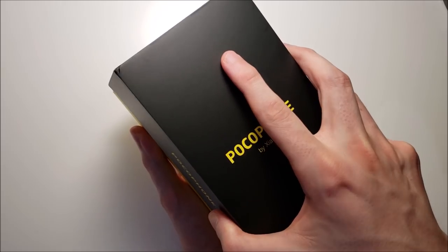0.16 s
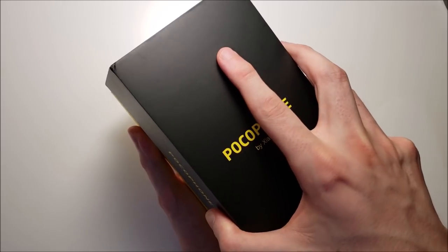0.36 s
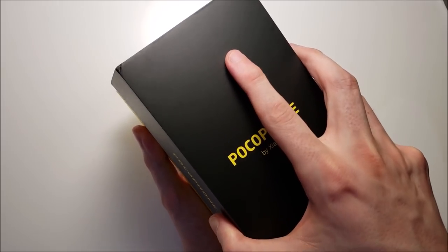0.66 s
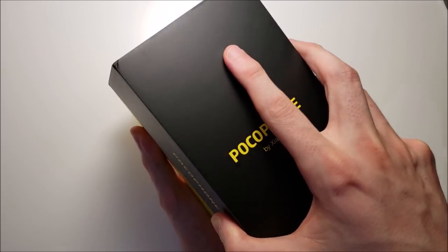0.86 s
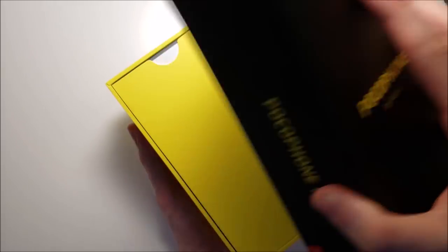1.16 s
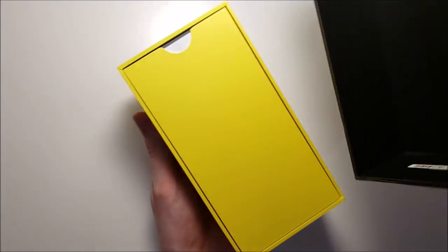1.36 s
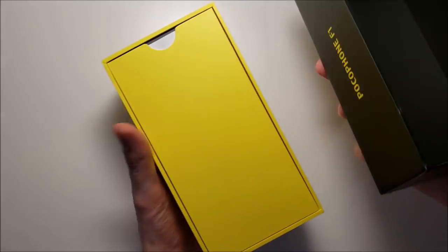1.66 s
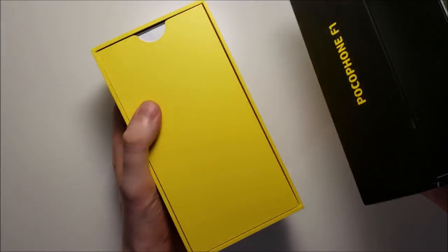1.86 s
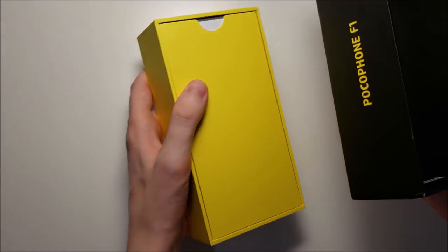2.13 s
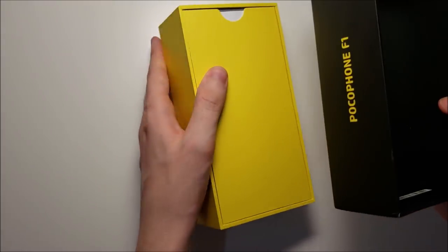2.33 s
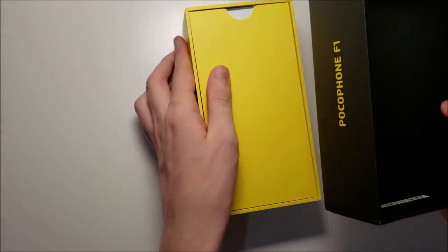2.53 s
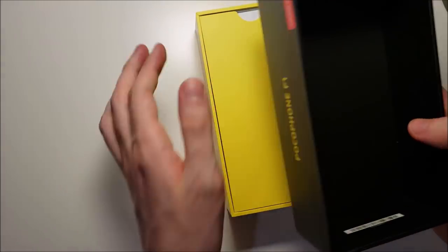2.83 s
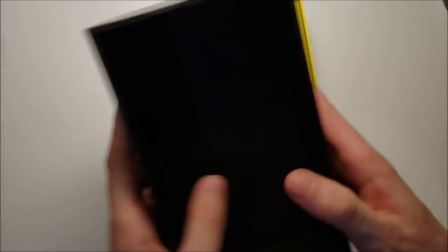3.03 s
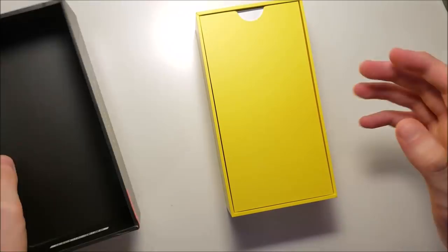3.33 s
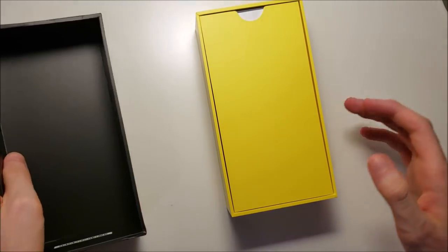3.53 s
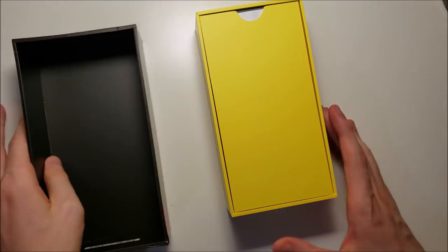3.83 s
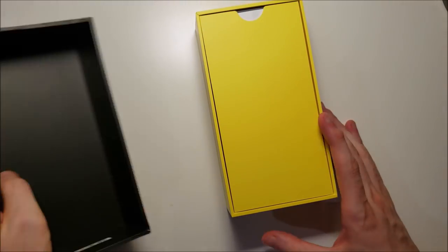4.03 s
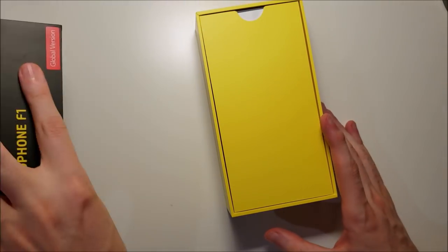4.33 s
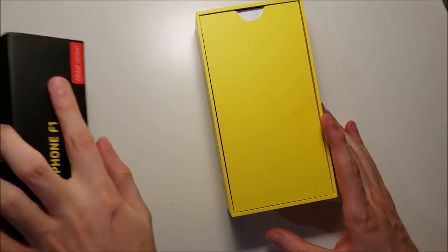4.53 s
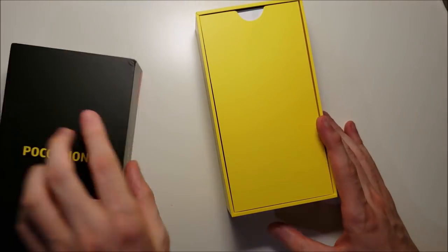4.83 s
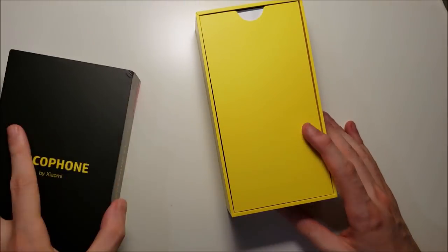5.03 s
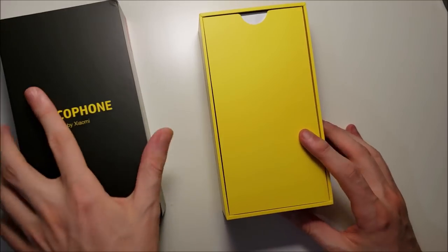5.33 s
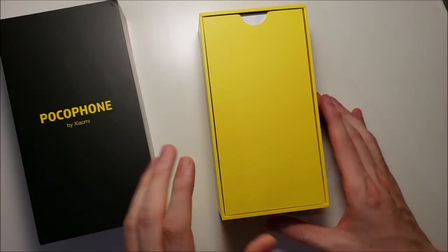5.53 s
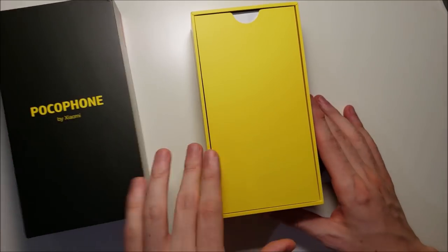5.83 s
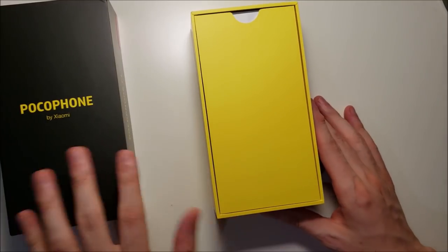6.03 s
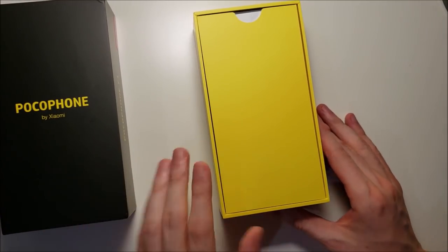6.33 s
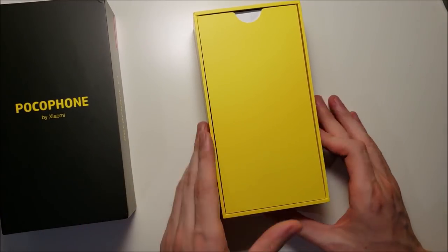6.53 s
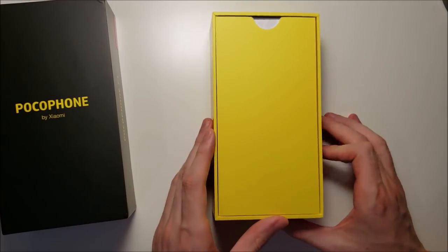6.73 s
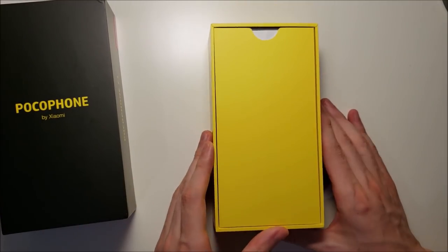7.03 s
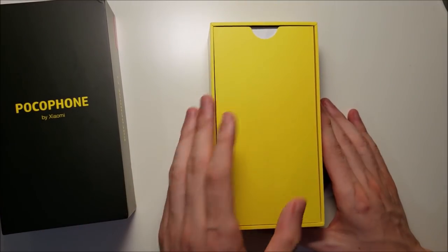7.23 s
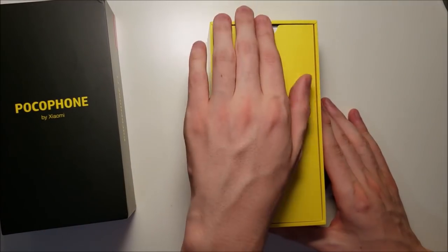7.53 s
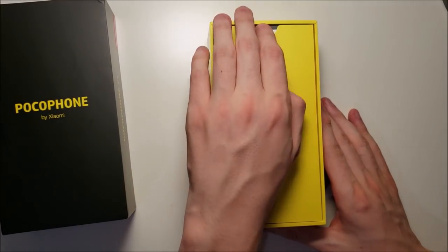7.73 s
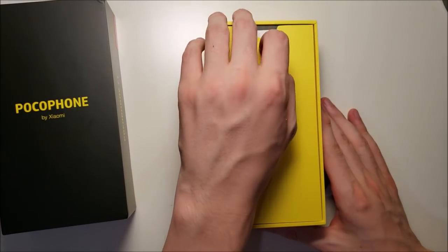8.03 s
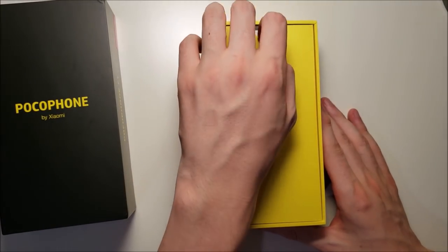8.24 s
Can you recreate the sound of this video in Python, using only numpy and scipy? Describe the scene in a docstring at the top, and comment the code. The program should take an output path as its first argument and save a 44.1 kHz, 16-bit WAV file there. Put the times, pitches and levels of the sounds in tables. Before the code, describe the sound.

A small room with a steady low rumble and faint hiss, heard through a close stereo microphone. From 0 to 0.9 s a snug card lid creeps off its tray with very soft friction, ending in a brush and a dull bump at about 1 s. Light fingertip taps and faint rubbing follow until 2 s. At 2.2 to 2.65 s the tray is set down: a few hollow knocks, the last heavy, with short gritty scrapes. Small bumps come around 3.1 s, a firmer one at 3.8 s with dragging. The strongest boxy thuds land at 4.4 and 4.75 s, with hissing slides. Fingers brush hollow card clearly at 5 to 5.3 s, then around 5.75 and 6.2 s, while the rumble dips near 5.7 s. Gentle slides follow at 6.6 to 7.1 s, a soft pat at 7.5 s, tiny taps around 8 s, and a barely audible thin whine.

```python
"""A small room with a low rumble, a close stereo microphone, and a stiff cardboard box handled on a table.
First the lid creeps up the tray as hands slip it off: soft card friction, then brushing skin and finger taps.
The tray is set down, the lid turned over and dropped beside it: dull knocks shaped by weight and hardness,
with hollow box booms and table modes. Card grinds and hisses over the table and fingers brush in between.
Late on the rumble sinks for a moment, and near the end a faint thin whine comes up in the background."""
import sys
import numpy as np
from scipy import signal
from scipy.fft import rfft, irfft, next_fast_len
from scipy.io import wavfile
from scipy.ndimage import map_coordinates

SR = 44100
rng = np.random.default_rng(int(sys.argv[2]) if len(sys.argv) > 2 else 0)


def int16_out(signal):
    """Quantize to a 16-bit WAV file."""
    q = np.round(np.clip(np.atleast_2d(signal).T, -1, 1) * 32767)
    wavfile.write(sys.argv[1], SR, q.astype(np.int16))


N = 369545  # samples

# Levels stand ahead of the echoes and the recorder; spectra are relative.
# room rumble and faint hiss: [f/Hz, level/dB]
BACKGROUND = [(20, -25.5), (38, -9.5), (56, 1), (85, -12), (150, -8), (260, -13), (350, -21), (480, -19.5),
              (800, -31), (1500, -48.5), (3000, -50), (9000, -53), (13000, -48), (15500, -51)]
# left-right likeness of diffuse sound at the microphones: [f/Hz, correlation]
ALIKE = [(130, 0.98), (300, .75), (640, .45), (1400, 0), (15000, 0)]
# faint thin tone: [full at t/s, rise/s, hold/s, fall/s, level/dB]
WHINE = [(8.2, 0.29, 0.2, .1, -62)]
# snug lid scuffing up the tray: [full pressure at t/s, rise/s, hold/s, fall/s, level/dB]
CREEP = [(0.02, 0.38, 0.13, 0.42, -61), (0.66, 0.49, 0.055, 0.065, -62), (0.92, 0.14, 0, 0.084, -55),
         (1.316, 0.03, 0.002, 0.028, -53.5)]
# friction colour of lid against tray: [f/Hz, level/dB]
SLEEVE = [(700, -3), (1100, -6.5), (1400, 1), (1900, -8), (2800, -19), (6000, -28.5)]
# fingers brushing a hollow box: [full pressure at t/s, rise/s, hold/s, fall/s, hollow level/dB, hiss level/dB]
BRUSHES = [(0.92, 0.088, 0, 0.05, -54.5, -58.5), (0.942, 0.015, 0.0045, 0.012, -58, -44.5),
           (1.35, 0.23, .09, 0.1, -66, -69.5), (1.62, 0.26, 0.013, 0.22, -64, -66),
           (2.09, 0.086, 0, .25, -88, -68), (3.062, 0.017, 0.02, 0.036, -64, -65),
           (3.185, 0.1, 0.0055, 0.048, -69, -59.5), (5.01, 0.15, .05, 0.013, -47.5, -48.5),
           (5.12, 0.035, 0.21, 0.1, -45, -43.5), (5.748, 0.0564, 0.022, 0.059, -42.5, -63.5),
           (5.885, 0.11, 0.053, 0.064, -53.5, -55.5), (6.19, 0.0313, 0, 0.085, -42, -53),
           (7.54, .02, 0, .08, -48.5, -69), (8.11, 0.071, 0.0099, .12, -68, -67.5)]
# resonances of the box's air and panels: [f/Hz, width/Hz, level/dB]
HOLLOW = [(453, 42, 7), (548, 50, 5), (953.5, 470, -11.5), (1880, 200, -22)]
# hiss of skin on smooth card: [f/Hz, level/dB]
SKIN = [(1200, -2), (2200, -4), (3200, -8), (4200, 1.5), (5700, -9.5), (6700, -5), (7200, 0), (7900, -7),
        (8700, -11.5), (11500, -8.5), (15500, -14)]
# knocks of tray, lid and hand; a box held in the air hardly rings the table:
# [t/s, strength level/dB, bass weight level/dB, hardness f/Hz, click level/dB, table ring level/dB,
#  booms of the struck panels [f/Hz, level/dB, t60/s]]; weight, click, ring and booms are relative to strength
KNOCKS = [(0.945, -2, 7, 1100, -31.5, -16, [(839, -31.5, 0.058)]),
          (1.0262, 15.5, -20, 844, -24.5, -25, [(305, -25, 0.036), (560, -35.5, .06), (1650, -43.5, .035)]),
          (2.2376, 9, 2.5, 550, -36.5, -0.5, [(379, -34, 0.066)]),
          (2.262, -1, 4.5, 480, -40, -19, [(340, -27.5, .05)]),
          (2.399, 16, -2, 1400, -33.5, 1.5, [(770, -28.5, 0.035), (525, -36.5, .08)]),
          (2.6482, 24, 2.5, 1230, -24, 1, [(116, -28, 0.18), (155, -34, .16), (245, -34, .06),
          (516, -38.5, .05), (849, -39, 0.063)]), (3.051, 2.5, 11.5, 297, -52, -16, [(314, -36, 0.13)]),
          (3.076, -10, -2, 1310, -27.5, -10, [(830, -29, 0.043)]),
          (3.141, -12.5, -6, 1610, -23.5, -11, [(880, -32, .05)]),
          (3.187, -15, -4, 1470, -25, -9, [(345, -24, .08)]),
          (3.5605, 3.5, -2.5, 618, -42, -13, [(169.6, -34, 0.2)]),
          (3.804, 13, -4, 1660, -22.5, 3.5, [(885, -32.5, 0.075), (690, -35.5, .06), (1280, -35.5, .06)]),
          (4.39, 11, -3, 740, -33.5, -2, [(248, -17, 0.12)]),
          (4.3939, 24.5, 3.5, 870, -31, -2, [(178, -36, 0.24), (305, -29.5, 0.072), (940, -36, .05)]),
          (4.7551, 26.5, -6.5, 1840, -28.5, 3.5, [(157, -40, 0.19), (450, -35.5, .08)]),
          (4.763, 20, -3, 1730, -31.5, -2, [(538, -29.5, .11), (187, -33.5, .12)]),
          (4.781, 22, 2, 1103, -28, -6.5, [(312, -25.5, 0.06)]),
          (5.0436, 6.5, -18, 800, -28, 1, [(212, -33.5, 0.11)]),
          (5.053, 7.5, -1, 440, -28, -25, [(424, -26, 0.084)]),
          (6.169, 4.5, 6.5, 413, -43, -9, [(439.6, -36.5, 0.094)]),
          (6.252, -7.5, -12, 450, -27.5, 10, [(490, -28, .05)]),
          (7.198, -10.5, 2, 452, -36, -6, [(255, -40, .1)]),
          (7.521, -1, -1.5, 546.5, -32, 4.5, [(505, -31.5, 0.08), (122, -26, .12)])]
# colour of the card, stamped on every knock: [f/Hz, level/dB]
CARD = [(180, -0.5), (240, -7), (310, 1), (390, -4), (520, -0.5), (1600, 2.5), (2080, 0.5), (2450, -5.5),
        (3300, -3), (4300, 0), (5600, -8.5), (7400, -1.5), (8600, -11.5), (15500, -12)]
# modes of table and room, rung by every knock and tap: [f/Hz, level/dB, t60/s]
TABLE = [(114.6, 3.5, 0.33), (155, 7.5, .25), (311, -8, .3), (436, 4, 0.16), (544, 2, 0.27),
         (656, -2.5, .25), (847, 2.5, 0.42), (978, 7, .28), (1145, -1.5, .2), (1580, 0, 0.19),
         (2047, 8.5, 0.31)]
# decay of the room: [f/Hz, t60/s]
ROOM = [(120, 0.5), (700, 0.28), (2000, 0.37), (5000, 0.35), (14000, 0.33)]
# light fingertip taps: [t/s, level/dB, pitch f/Hz]
TAPS = [(1.316, -10, 1000), (1.362, -24, 4030), (1.538, -4.5, 730), (1.754, -10.5, 910), (1.853, -10, 850),
        (2.279, -5, 1150), (3.059, -16, 1720), (3.107, -10, 1260), (3.952, 1.5, 684), (5.473, -20, 3610),
        (5.689, -3.5, 520), (7.177, -9.5, 599), (7.2, -20, 1250), (7.942, -17, 1390), (8.08, -19, 1856)]
# card dragged over the table: [full pressure at t/s, rise/s, hold/s, fall/s, grind level/dB, hiss level/dB]
DRAGS = [(2.405, 0.013, .04, 0.19, -40, -52), (2.445, 0.055, .02, .13, -53, -46.5),
         (2.545, 0.056, .015, .07, -49, -63), (2.63, 0.083, 0.012, .1, -46, -44),
         (2.83, 0.03, 0.01, 0.06, -54, -63.5), (3.79, .19, 0.035, 0.15, -49.5, -52.5),
         (4.04, 0.08, 0.02, 0.06, -47, -46.5), (4.42, 0.044, 0.0017, 0.079, -59, -50),
         (4.56, 0.17, 0.018, .12, -51.5, -51), (4.655, .07, .03, 0.1, -47, -43.5),
         (4.82, 0.11, 0.015, .2, -45.5, -44.5), (6.65, 0.04, 0.045, .07, -51, -50.5),
         (6.785, 0.11, 0.028, 0.13, -49.5, -58), (6.965, 0.08, .015, 0.05, -59.5, -77),
         (7.04, 0.0297, 0.017, 0.086, -56, -72)]
# low grind of dragged card: [f/Hz, level/dB]
GRIND = [(100, -26), (300, -4), (700, 1), (1400, -3), (2300, -6.5), (3000, -13), (4500, -32.5)]
# high hiss of dragged card: [f/Hz, level/dB]
HISS = [(1200, -2.5), (2500, 7.5), (4500, 5), (6000, 3), (8000, 2.5), (12000, 0), (15500, -4.5)]
# echoes off table, boxes and wall, one list for each microphone, left then right: [delay t/s, gain]
ECHOES = [
    [(.0013, 0.15), (.0047, 0.18), (.0094, 0.22), (.0161, 0.17)],
    [(.0021, 0.12), (.0056, .3), (.0092, 0.17), (.0183, 0.14)],
]

RUMBLE_DB = -49
LULL_S, LULL_WIDTH_S, LULL_DB = 5.66, 0.63, -4  # the rumble and hiss sink once
FADE_DB = 21.5  # change over one rise or fall time; the slope carries on beyond it
# shape of every blow: bass shelf, slope, fall above its hardness
BASS_HZ, TILT_DB_PER_OCT, SOFTNESS_DB_PER_OCT = 172, -2.5, 22
CLICK_HZ, CLICK_DB_PER_OCT = 5000, -7
TOP_HZ = 15830  # band limit of the recorder


def amp(db):
    """Decibels to gain."""
    return 10 ** (np.asarray(db) / 20)


def unit(x):
    """Scale to rms 1."""
    return x / np.sqrt(np.mean(x ** 2) + 1e-20)


def along(points, hz):
    """Read (Hz, value) points on a log frequency axis."""
    f, v = np.transpose(points)
    return np.interp(np.log(hz + 1), np.log(f + 1), v)


def filtered(x, response):
    """Multiply the spectrum of x by a response of frequency."""
    n = x.shape[-1]
    padded = next_fast_len(n + SR // 8)
    spectrum = rfft(x, padded) * response(np.fft.rfftfreq(padded, 1 / SR))
    return irfft(spectrum, padded)[..., :n]


def coloured(x, points):
    """x with this (Hz, dB) spectrum, at rms 1."""
    return unit(filtered(x, lambda hz: amp(along(points, hz))))


def diffuse(size):
    """White stereo noise, alike in the bass and unrelated in the treble."""
    def mid_side(hz):
        turn = np.arccos(np.clip(along(ALIKE, hz), -1, 1)) / 2
        return np.array([np.cos(turn), np.sin(turn)])

    mid, side = filtered(rng.standard_normal((2, size)), mid_side)
    return np.array([mid + side, mid - side])


def wobble(rate):
    """A smooth random curve, rate knots a second."""
    knots = rng.standard_normal(int(N * rate / SR) + 4)
    return map_coordinates(knots, [np.arange(N) * rate / SR])


def swells(rows):
    """Rise, hold and fall, straight in dB, summed over the rows: one gain curve for each dB column."""
    t, gains = np.arange(N) / SR, 0
    for s, rise, hold, fall, *db in rows:
        before = np.maximum(s - t, 0) / rise
        after = np.maximum(t - s - hold, 0) / fall
        gains = gains + np.outer(amp(db), amp(-FADE_DB * (before + after)))
    return gains


def background(whine_hz=641):
    """Room rumble and faint hiss that sink for a moment, and a thin whine of unsteady pitch near the end."""
    t = np.arange(N) / SR
    lull = np.exp(-((t - LULL_S) / LULL_WIDTH_S) ** 2)
    rumble = amp(RUMBLE_DB + LULL_DB * lull) * coloured(diffuse(size=N), BACKGROUND)
    pitch = whine_hz + 2.36 * wobble(14)
    whine = np.sin(2 * np.pi * np.cumsum(pitch) / SR)
    return rumble + swells(WHINE) * unit(whine)


def friction(grain_db, unsteady_db):
    """Noise of fibres catching and letting go under an uneven hand."""
    return diffuse(size=N) * amp(grain_db * wobble(500) + unsteady_db * wobble(40))


def creep():
    """The walls of lid and tray rub softly until they part."""
    return swells(CREEP) * coloured(friction(grain_db=2.5, unsteady_db=1.8), SLEEVE)


def box_response(f):
    """The hollow of the box as resonances of alternating sign."""
    total = 0
    for k, (centre, width, db) in enumerate(HOLLOW):
        damping = 1j * f * width
        total = total + (-1) ** k * amp(db) * damping / (centre ** 2 - f ** 2 + damping)
    return total


def brushes():
    """Skin hisses on the smooth card and wakes the hollow of the box."""
    hollow, hiss = swells(BRUSHES)
    low = hollow * unit(filtered(friction(grain_db=1.5, unsteady_db=0.7), box_response))
    high = hiss * coloured(friction(grain_db=2.2, unsteady_db=1.3), SKIN)
    return (low + high) * amp([[.8], [-.8]])  # a little to the left


def highpass(x, hz):
    """Cut the bass below hz."""
    return signal.sosfilt(signal.butter(2, hz, "high", fs=SR, output="sos"), x)


def causal(points, size=4096):
    """The minimum-phase pulse that has this (Hz, dB) spectrum."""
    cepstrum = irfft(np.log(amp(along(points, np.fft.rfftfreq(size, 1 / SR)))))
    # folding the cepstrum forward in time leaves no sound ahead of the contact
    cepstrum[1:size // 2] *= 2
    cepstrum[size // 2 + 1:] = 0
    return irfft(np.exp(rfft(cepstrum)))


def add(track, s, sound):
    """Mix a sound in at time s."""
    part = track[:, max(round(s * SR), 0):][:, :sound.shape[-1]]
    part += sound[:, :part.shape[-1]]


def dying(t, t60s):
    """Stereo noise of energy 1 that builds up softly and whose bands die at their own speeds."""
    hz, s, z = signal.stft(diffuse(size=len(t)), SR, nperseg=256)
    decay = amp(-60 * s / along(t60s, hz)[:, None])
    tail = signal.istft(z * decay, SR, nperseg=256)[1][:, :len(t)]
    return unit(tail * (1 - np.exp(-t / 0.0075))) / np.sqrt(len(t))


def spread(t, table_db, direct_db, panel_db, panel_t60, room_db):
    """What one contact becomes: a direct click, the brief flutter of the panels, the table's modes and the room."""
    flutter = unit(diffuse(size=len(t)) * amp(-60 * t / panel_t60)) / np.sqrt(len(t))
    dense = amp(panel_db) * flutter + amp(room_db) * dying(t, ROOM)
    dense[:, 0] += amp(direct_db)
    # in the bass the resonances are few and stand apart
    answer = highpass(dense, 170)
    for hz, db, t60 in TABLE:
        height = 2 * np.log(1000) / (t60 * SR)  # long and short modes peak alike in the spectrum
        # shorter waves reach the two microphones further out of step
        phase = rng.standard_normal((2, 1)) * hz / 900
        level = table_db + db + rng.normal(0, 1)  # each contact excites a mode a little differently
        answer += height * amp(level - 60 * t / t60) * np.cos(2 * np.pi * hz * t + phase)
    return answer


def blow(weight_db, hardness_hz, click_db):
    """Spectrum of a contact: a heavy one has more bass, a soft one ends lower, and a thin click lies on top."""
    hz = np.geomspace(45, TOP_HZ, num=60)
    weight = weight_db / (1 + (hz / BASS_HZ) ** 4)
    small_box = -10 * np.log10(1 + (105 / hz) ** 6)  # a small box radiates little deep bass
    tilt = TILT_DB_PER_OCT * np.log2(hz / 500)
    soft = -10 * np.log10(0.5 + (hz / hardness_hz) ** (SOFTNESS_DB_PER_OCT / (10 * np.log10(2))))
    push = amp(weight + small_box + tilt + soft)
    # the click slopes only between 2400 Hz and CLICK_HZ
    click = amp(click_db + CLICK_DB_PER_OCT * np.log2(np.clip(hz, 2400, CLICK_HZ) / CLICK_HZ))
    return np.column_stack([hz, 20 * np.log10(np.hypot(push, click))])


def knocks(boom_rise_s=0.0013, left_db=1.5):
    """Each contact has its own hardness and sets a few panels of the struck box booming for some cycles."""
    out, t = np.zeros((2, N)), np.arange(SR // 2) / SR
    card = causal(CARD)
    for s, db, weight_db, hardness_hz, click_db, table_db, booms in KNOCKS:
        pulse = signal.fftconvolve(causal(blow(weight_db, hardness_hz, click_db)), card)
        answer = spread(t, table_db, direct_db=-10.5, panel_db=0.5, panel_t60=0.07, room_db=-4.5)
        sound = signal.fftconvolve(answer, pulse[None], axes=1)[:, :len(t)]
        for boom_hz, boom_db, boom_t60 in booms:
            swing = amp(boom_db - 60 * t / boom_t60) * (1 - np.exp(-t / boom_rise_s))
            sound = sound + highpass(swing * np.sin(2 * np.pi * boom_hz * t), 0.48 * boom_hz)
        add(out, s, amp(db) * sound)

    # the boxes lie a little to the left, which shows above the bass
    def lean(hz):
        return amp(np.array([[left_db], [-left_db]]) * hz ** 2 / (hz ** 2 + 700 ** 2))

    return filtered(highpass(out, 90), lean)


def taps(skirt_db=-18):
    """A fingertip landing on card gives a small tick around one pitch."""
    out, t = np.zeros((2, N)), np.arange(SR // 4) / SR
    for s, db, hz in TAPS:
        far_db = db + 2 * skirt_db
        pulse = causal([(hz / 8, far_db), (hz / 2, db + skirt_db / 2), (hz, db),
                        (2 * hz, db + skirt_db), (8 * hz, far_db)])
        answer = spread(t, table_db=2.0, direct_db=-14.5, panel_db=-4.0, panel_t60=0.029, room_db=-7.5)
        add(out, s, signal.fftconvolve(answer, pulse[None], axes=1))
    return out


def drags():
    """Card edges grind and hiss over the table top, grainy but even in pressure."""
    grind, hiss = swells(DRAGS)
    low = grind * coloured(friction(grain_db=2.5, unsteady_db=1.2), GRIND)
    high = hiss * coloured(friction(grain_db=2.4, unsteady_db=1.7), HISS)
    return (low + high) * amp([[.3], [-.3]])  # barely to the left


def echoed(x):
    """Nearby surfaces return short echoes, which comb everything above the bass."""
    def comb(hz):
        rows = [sum(gain * np.exp(-2j * np.pi * hz * delay) for delay, gain in side) for side in ECHOES]
        echoes = np.array(rows) * hz ** 2 / (hz ** 2 + 500 ** 2)
        trim = np.sqrt(1 + 0.6 * hz ** 2 / (hz ** 2 + 700 ** 2))  # up to 2 dB less above the bass
        return (1 + echoes) / trim

    return filtered(x, comb)


def scene(rub_room_db=-8.5):
    """All the handling, with its near echoes, over the room's background."""
    rubs = creep() + brushes() + drags()
    tail = signal.fftconvolve(rubs, dying(np.arange(SR // 2) / SR, ROOM), axes=1)[:, :N]
    handling = knocks() + taps() + rubs + amp(rub_room_db) * tail
    return background() + echoed(handling)


def record(dry):
    """The recorder rounds off the highest peaks and keeps nothing above its band limit."""
    rounded = dry / (1 + np.abs(dry) ** 6) ** (1 / 6)
    return filtered(rounded, lambda hz: hz < TOP_HZ)


dry = scene()
out = record(dry)
int16_out(out)
```